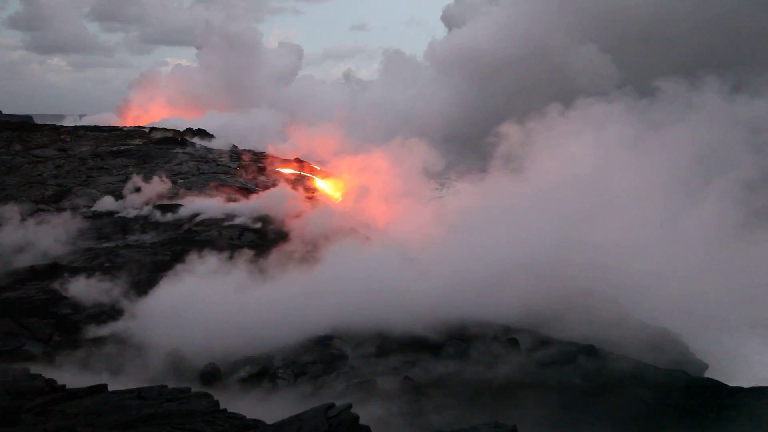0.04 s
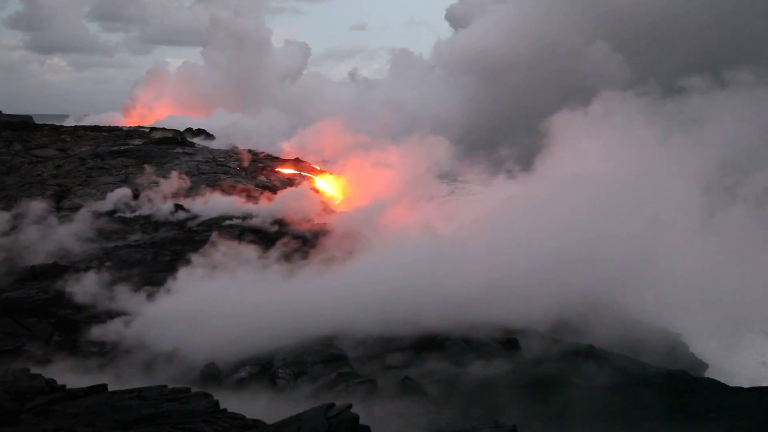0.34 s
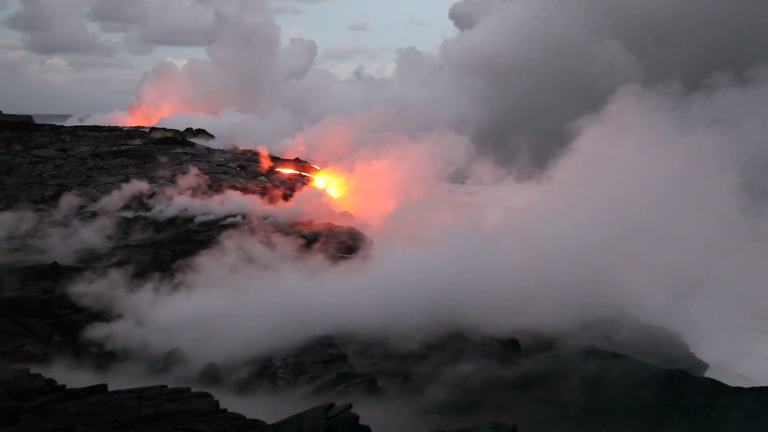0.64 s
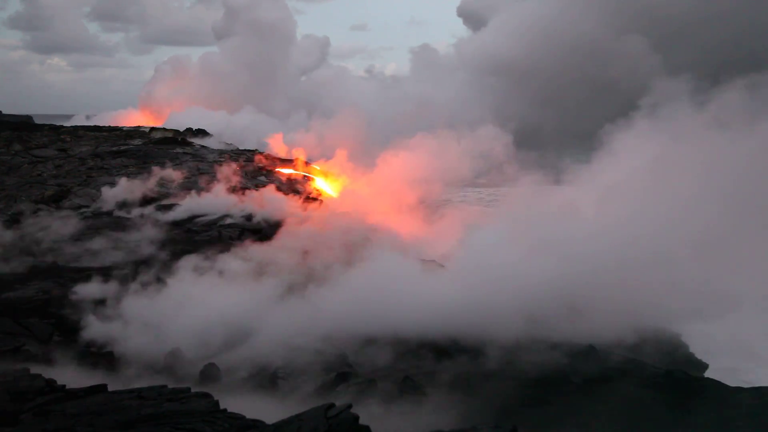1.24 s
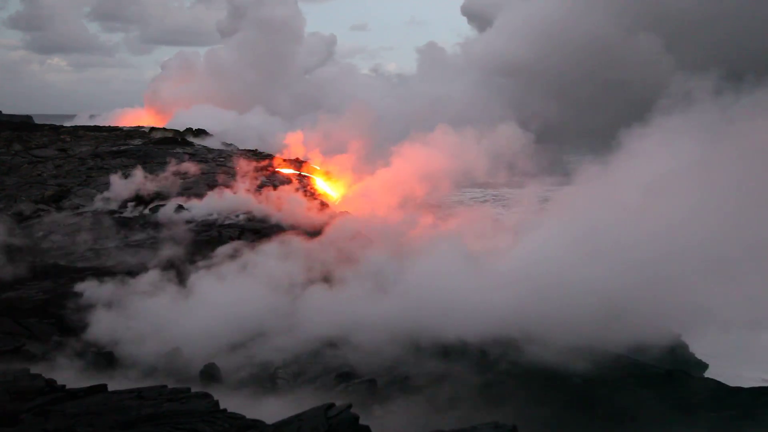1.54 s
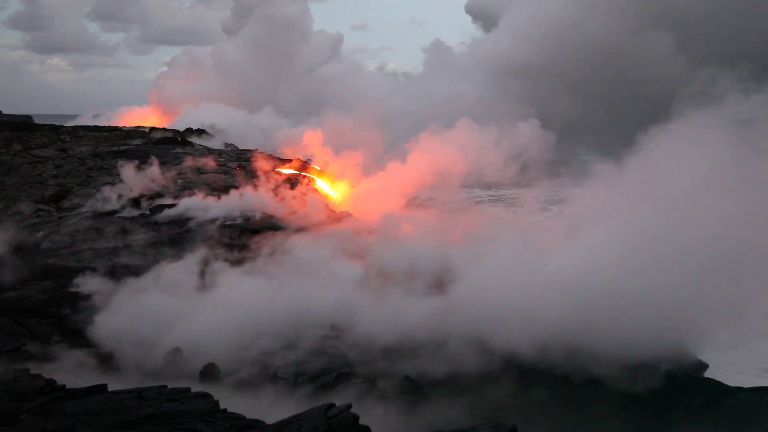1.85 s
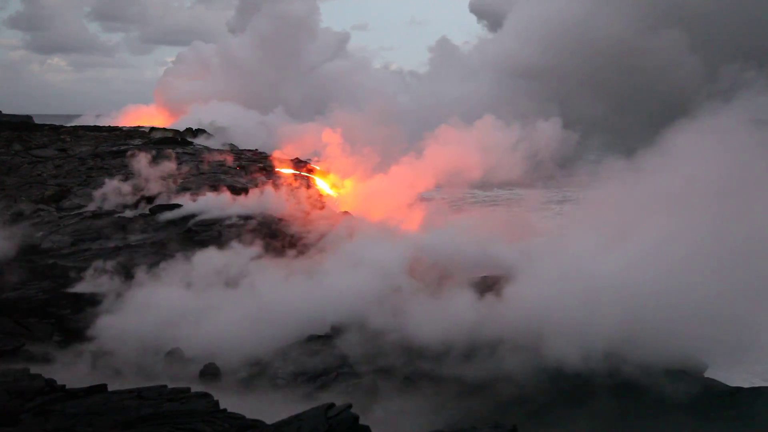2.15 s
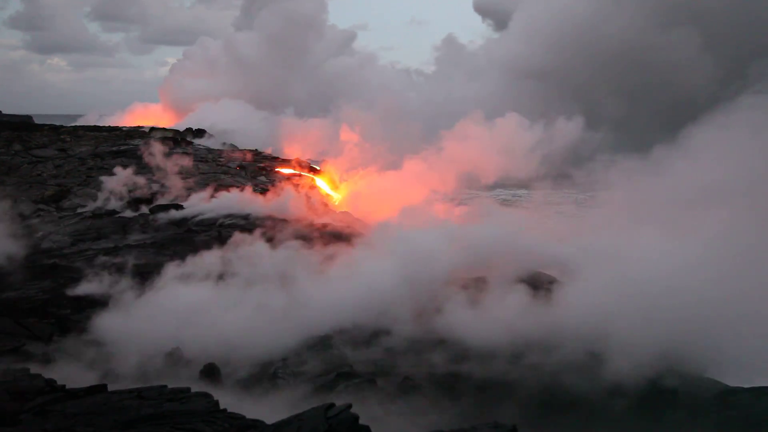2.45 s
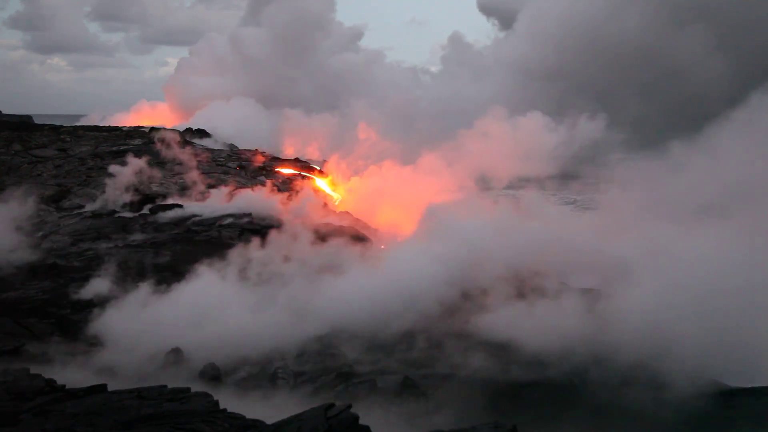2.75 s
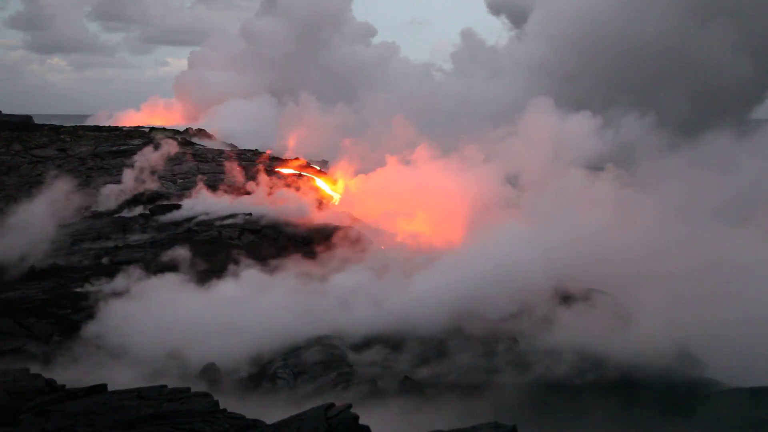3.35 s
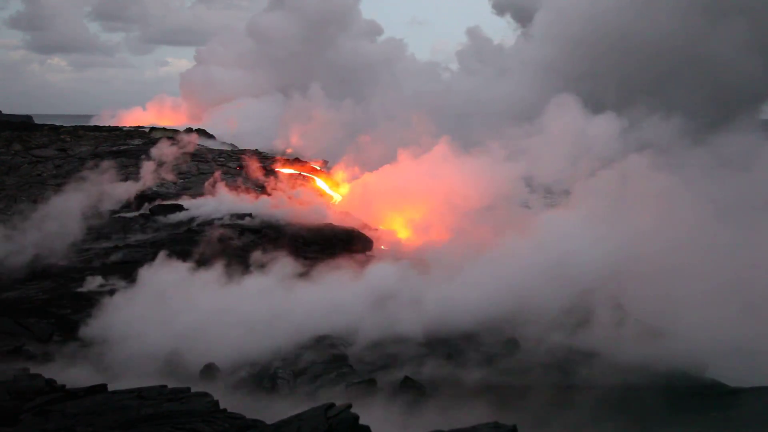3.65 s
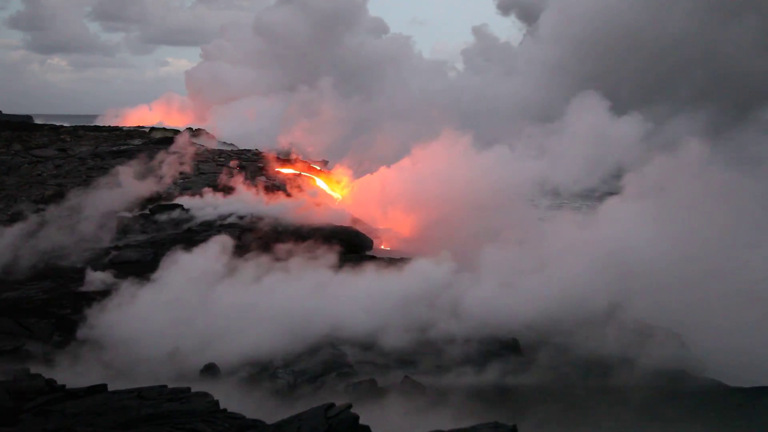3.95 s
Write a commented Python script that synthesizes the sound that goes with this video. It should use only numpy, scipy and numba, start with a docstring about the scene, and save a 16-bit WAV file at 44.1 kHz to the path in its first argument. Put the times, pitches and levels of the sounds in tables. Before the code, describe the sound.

Gusty wind rumbles on the microphone over a faint hiss of steam and surf.

```python
"""Gusts of wind rumble and flutter on a microphone, on a cliff above lava running into the sea.
Turbulence makes the sound: small eddies merge into a noise, and strong ones thump one by one.
In the distance steam hisses, water seethes on the lava and spits once, and surf washes dully.
An automatic gain control ducks a little under the strongest gusts."""
import sys
import numpy as np
from scipy import signal
from scipy.fft import rfft, irfft
from scipy.io import wavfile
from scipy.ndimage import map_coordinates
from numba import njit

SR = 44100
rng = np.random.default_rng(int(sys.argv[2]) if len(sys.argv) > 2 else 0)


def unload_wav(signal):
    """Save mono or channel-first audio to the path in sys.argv[1] as 16-bit WAV at rate SR, clipped to [-1, 1]."""
    wavfile.write(
        sys.argv[1],
        SR,
        np.round(np.clip(np.atleast_2d(signal).T, -1, 1) * 32767).astype(np.int16),
    )


N = 176400

# Envelopes of the slow air and of the fast gusts. Each row: time in seconds, relative level in dB.
RUMBLE_ENVELOPE = [(0,-18),(.09,-17),(.14,-26),(.19,-21),(.23,-15),(.29,-22.5),(.34,-17),(.41,-26),(.44,-17),(.54,-16),(.57,-19.5),(.78,-21),(.82,-16.5),(.90,-22.5),(1.03,-13),(1.15,-23),(1.33,-17),(1.42,-27.5),(1.55,-19),(1.83,-24),(1.90,-37),(1.94,-20),(2.06,-18),(2.35,-21),(2.70,-26),(2.92,-20.5),(3.02,-23),(3.21,-19),(3.34,-23),(3.55,-21),(3.78,-23.5),(4.0,-17.5)]
GUST_ENVELOPE = [(0,-27.5),(.12,-34.5),(.40,-38),(.54,-28.5),(.57,-43),(.70,-29.5),(.82,-28),(.91,-42),(1.02,-21),(1.19,-33),(1.34,-20),(1.46,-33.5),(1.54,-27),(1.72,-34),(1.90,-45),(1.99,-30),(2.04,-33),(2.065,-21.5),(2.12,-22.5),(2.16,-19.5),(2.22,-28),(2.30,-22),(2.40,-28.5),(2.55,-29),(2.74,-37),(3.25,-33),(3.34,-42),(3.41,-31),(3.81,-33.5),(4.0,-26)]
# Spectra of the turbulence. Each row: frequency in Hz, relative spectral density in dB.
RUMBLE_SPECTRUM = [(18,-24),(40,-12.5),(60,-4),(90,-0.5),(170,1),(300,-1.5),(450,-5),(700,-15),(1200,-48),(2500,-65),(16000,-130)]
FLUTTER_SPECTRUM = [(100,-14),(250,-3.5),(450,0.5),(650,-2.5),(900,-8),(1300,-18),(1900,-32),(3000,-44),(16000,-120)]
TEARING_SPECTRUM = [(200,-23),(600,-2),(850,3.5),(1200,-6.5),(1800,-15.5),(2500,-29),(4000,-36),(16000,-110)]
# Strong eddies. Each row: start in seconds, relative levels of thump, slap and crack in dB.
EDDY_STRIKES = [(0.065,-10,-20,-20),(0.113,-8.5,-20,-18),(0.231,-6,-22,-26),(0.311,-8.5,-16,-18),(.433,-12.5,-19,-30),(0.467,-14,-29,-26),(.510,-7.5,-21,-18),(.531,-10,-18,-22),(.541,-7.5,-22,-18),(0.69,-33,-24,-20),(.829,-36,-15.5,-21),(.934,-28,-26,-23),(.942,-8.5,-29,-26),(0.983,-26,-28,-21),(1.013,-7.5,-13,-13),(1.026,-9,-27,-32),(1.059,-12,-15,-22),(1.203,-14.5,-31,-24),(1.329,-9,-22,-12),(1.532,-14,-10,-16),(1.616,-24,-17.5,-18),(1.923,-22,-22.5,-19),(1.928,-7,-27,-31),(1.99,-23,-13,-15),(2.029,-12,-27,-26),(2.059,-24,-14,-12),(2.072,-10,-19,-11),(2.103,-7,-15.5,-6),(2.140,-20,-16,-5),(2.155,-18,-19,-4),(2.177,-21,-21,-10),(2.232,-15,-11.5,-4.5),(2.431,-17,-10.5,-19),(2.624,-17,-23,-25),(2.875,-22,-20,-23),(3.086,-13,-23,-22),(3.130,-13,-19,-15),(3.187,-8,-17,-17),(3.279,-12.5,-25,-32),(3.296,-11.5,-24.5,-20),(3.534,-20,-21.5,-19)]
# Envelopes of the steam and of the boiling water. Each row: time in seconds, relative level in dB.
STEAM_ENVELOPE = [(0,-34),(.16,-35),(.24,-33),(.32,-34.5),(.44,-32.5),(.58,-37),(.84,-35.5),(1.1,-39.5),(1.6,-39),(1.9,-40),(2.15,-40),(2.5,-41),(2.8,-40.5),(2.94,-38),(3.72,-37.5),(3.97,-35.5)]
SEETHE_ENVELOPE = [(0,-40),(.45,-37),(.62,-44),(1.2,-54),(4,-60)]
# Spectra of the shore. Each row: frequency in Hz, relative spectral density in dB.
STEAM_SPECTRUM = [(200,-3.5),(800,-1),(1500,-0.5),(2600,-1.5),(4000,0),(5000,0),(6000,2),(7200,-0.5),(8100,-7),(10000,-17.5),(12500,-27.5),(16000,-34)]
SEETHE_SPECTRUM = [(300,-19),(1000,-4.5),(1900,-1),(3000,-9),(5000,-8),(8000,-28),(16000,-60)]
SURF_SPECTRUM = [(40,-15),(120,10),(350,6),(700,-0.5),(1400,-18.5),(3000,-39),(16000,-80)]

RUMBLE_DB, FLUTTER_DB, TEARING_DB, STEAM_DB, SURF_DB = 0.5, 4, 11, 2.5, -32.5
THUMP_DB, SLAP_DB, CRACK_DB = 3, -3.5, -1


def wind(tearing_power=1.7):
    """Turbulent pressure: slow eddies rumble, fast ones flutter, and the hardest gusts tear."""
    shake = walk(rate_hz=60)  # all three layers waver together
    gust = curve(GUST_ENVELOPE)
    rumble = colour(eddies(), RUMBLE_SPECTRUM) * undb(RUMBLE_DB + 0.87 * shake)
    flutter = colour(eddies(), FLUTTER_SPECTRUM) * undb(FLUTTER_DB + 1.38 * shake)
    tearing = colour(eddies(), TEARING_SPECTRUM) * undb(TEARING_DB + 2.6 * shake)
    return rumble * curve(RUMBLE_ENVELOPE) + flutter * gust + tearing * gust ** tearing_power


def eddies(per_s=900, spread_db=3):
    """Shot noise: small eddies arrive at random, each a pressure kick of uneven size and either sign."""
    arrivals = rng.random(N) < per_s / SR
    signs = rng.choice([-1, 1], N)
    return arrivals * signs * undb(spread_db * np.clip(rng.standard_normal(N), -2, 2))


def buffets(median_hz=142, attack_s=0.00044, slap_decay_s=0.0052, crack_s=0.00017):
    """Pressure transients: a strong eddy gives a sharp front, a turbulent slap and a damped swing."""
    out = np.zeros(N)
    air = colour(rng.standard_normal(N), FLUTTER_SPECTRUM)
    detunes = rng.standard_normal(len(EDDY_STRIKES))
    for (start, thump_db, slap_db, crack_db), detune in zip(EDDY_STRIKES, detunes):
        i = int(start * SR)
        t = np.arange(min(SR // 10, N - i)) / SR
        rise = 1 - np.exp(-t / attack_s)
        cycles = t * median_hz * np.exp(0.11 * detune)
        thump = np.sin(2 * np.pi * cycles) * np.exp(-cycles ** 2) * rise  # lasts about one cycle
        slap = 2 * air[i:i + len(t)] * rise * np.exp(-t / slap_decay_s)
        front = t / crack_s - 5  # centred five widths after the start
        crack = front * np.exp(-front ** 2 / 2)
        out[i:i + len(t)] += (undb(thump_db + THUMP_DB) * thump + undb(slap_db + SLAP_DB) * slap
                              + undb(crack_db + CRACK_DB) * crack)
    return out


def steam():
    """Vaporisation: a broadband hiss that swells as water washes over the lava."""
    hiss = colour(rng.standard_normal(N), STEAM_SPECTRUM)
    return hiss * curve(STEAM_ENVELOPE) * undb(STEAM_DB + 0.71 * walk(rate_hz=14))


def seethe():
    """Boiling: water on the lava makes a lower band of noise that dies away."""
    return colour(rng.standard_normal(N), SEETHE_SPECTRUM) * curve(SEETHE_ENVELOPE)


def spit(peak_s=0.239, width_s=0.0055, centre_hz=2500, width_hz=320, level_db=-30.5):
    """Jet noise: one short spit of steam gives a narrow-band burst."""
    band = np.exp(-((np.fft.rfftfreq(N, 1 / SR) - centre_hz) / width_hz) ** 2)
    noise = unit(irfft(rfft(rng.standard_normal(N)) * band, N))
    burst = np.exp(-((np.arange(N) / SR - peak_s) / width_s) ** 2)
    return undb(level_db) * noise * burst


def surf():
    """Incoherent summation: the waves below the cliff merge into a dull, slowly wavering wash."""
    return colour(rng.standard_normal(N), SURF_SPECTRUM) * undb(SURF_DB + 0.46 * walk(rate_hz=2))


def undb(db):
    """Amplitude ratio of a level in decibels."""
    return 10 ** (np.asarray(db) / 20)


def unit(x):
    """Normalisation to rms 1."""
    return x / np.sqrt(np.mean(x ** 2))


def curve(rows):
    """Amplitude envelope, interpolated linearly in decibels."""
    return undb(np.interp(np.arange(N) / SR, *np.array(rows).T))


def colour(x, spectrum):
    """Minimum-phase filtering: shapes x causally by the spectrum, then scales to rms 1."""
    hz, db = np.array(spectrum).T
    bins_hz = np.maximum(np.fft.rfftfreq(N, 1 / SR), 1)
    magnitude = undb(np.interp(np.log(bins_hz), np.log(hz), db))
    cepstrum = irfft(np.log(magnitude), N)
    causal = (np.arange(N) > 0) & (np.arange(N) < N // 2)
    response = np.exp(rfft(2 * cepstrum * causal))
    return unit(irfft(rfft(x) * response, N))


def walk(rate_hz):
    """Random modulation of rms 1: straight lines between Gaussian values."""
    knots = rng.standard_normal(2048)
    return unit(map_coordinates(knots, [np.arange(N) / SR * rate_hz], order=1, mode="wrap"))


@njit
def follow(x, attack_s, release_s):
    """Envelope detection: the rectified signal is smoothed, with separate rise and fall times."""
    out, level = np.empty(len(x)), 0.
    for i in range(len(x)):
        gap = abs(x[i]) - level
        level += gap / (SR * (attack_s if gap > 0 else release_s))
        out[i] = level
    return out


def gain_control(x, threshold_db=-11.5, slope=0.53):
    """Compression: the gain falls by slope dB for each dB of level above the threshold."""
    level = follow(x[0], attack_s=0.0098, release_s=0.32)
    return x * np.maximum(level / undb(threshold_db), 1) ** -slope


def scene():
    """Superposition: wind at the microphone adds to the distant shore in one channel."""
    return (wind() + buffets() + steam() + seethe() + spit() + surf())[None, :]


def record(dry, low_cut_hz=29, top_cut_hz=15600):
    """Band limiting and saturation: a low cut, gain control, rounded peaks and a steep top cut."""
    low_cut = signal.butter(2, low_cut_hz, "high", fs=SR, output="sos")
    top_cut = signal.ellip(10, .2, 80, top_cut_hz, fs=SR, output="sos")
    ducked = gain_control(signal.sosfilt(low_cut, dry))
    return signal.sosfilt(top_cut, np.tanh(ducked))


dry = scene()
out = record(dry)
unload_wav(out)
```